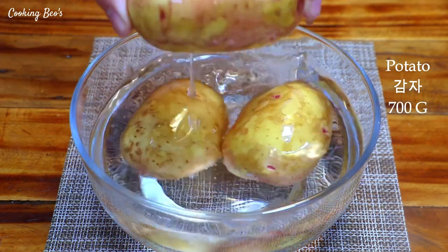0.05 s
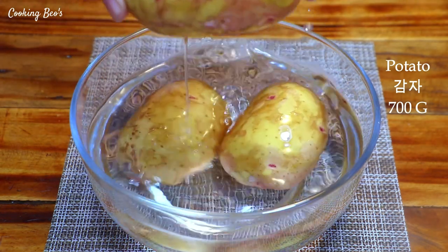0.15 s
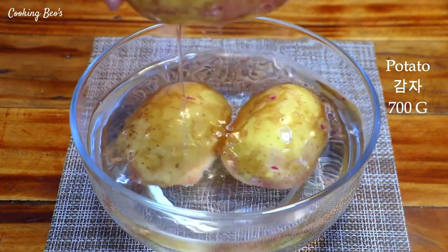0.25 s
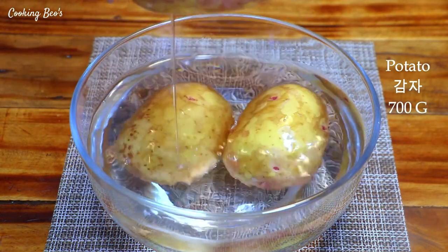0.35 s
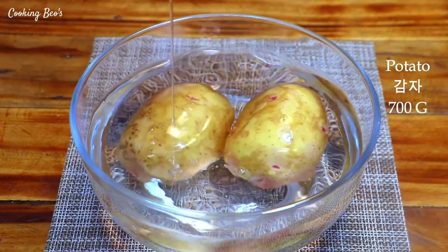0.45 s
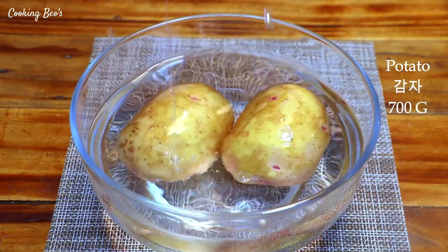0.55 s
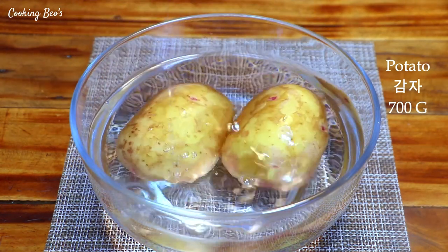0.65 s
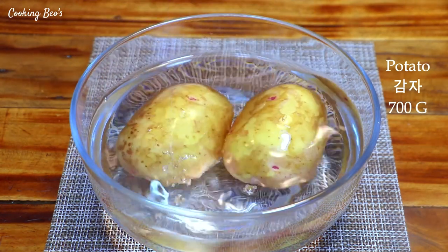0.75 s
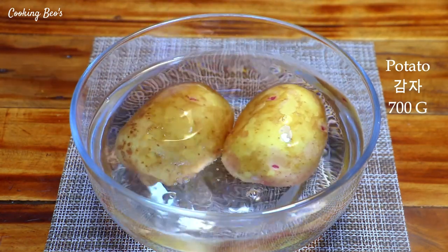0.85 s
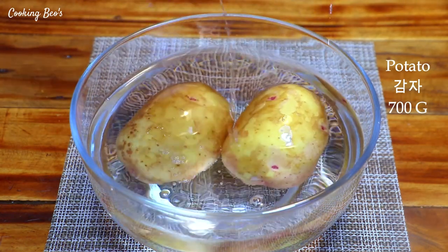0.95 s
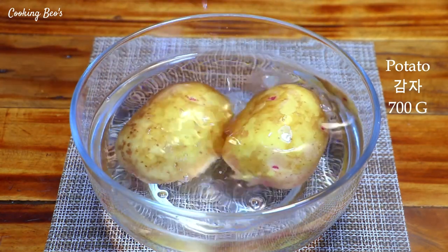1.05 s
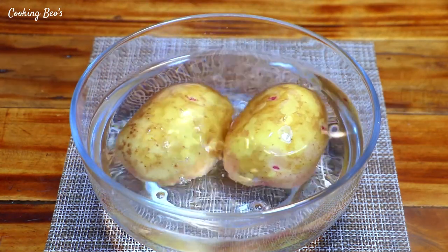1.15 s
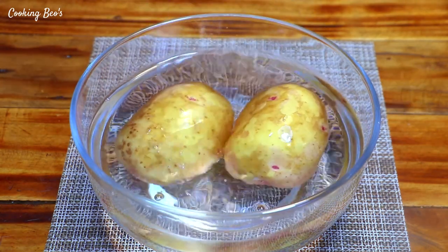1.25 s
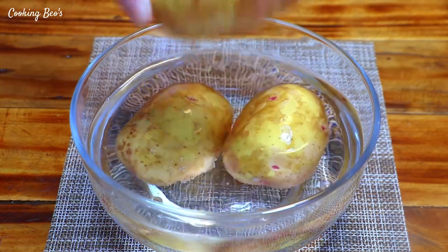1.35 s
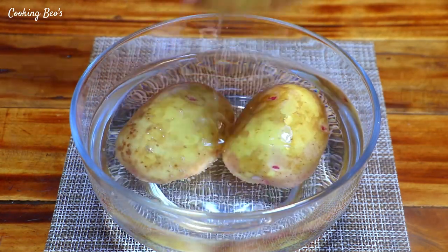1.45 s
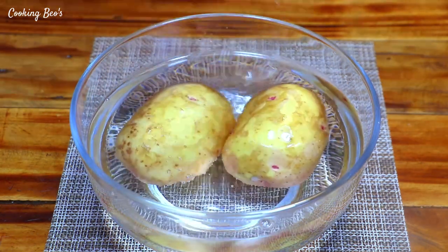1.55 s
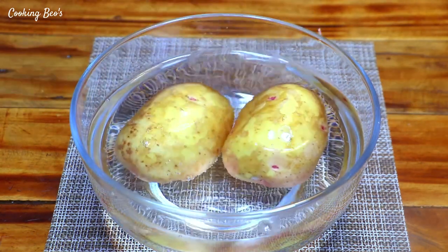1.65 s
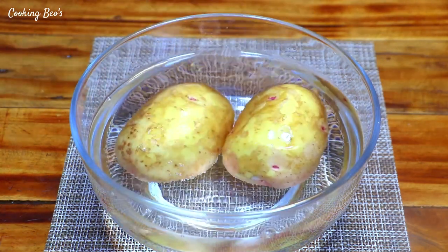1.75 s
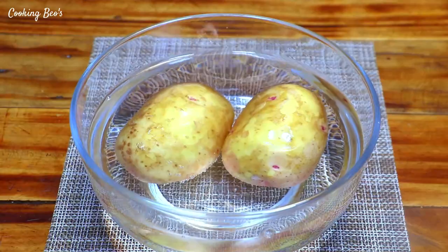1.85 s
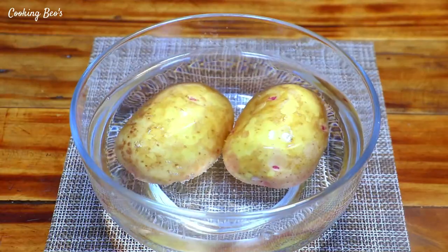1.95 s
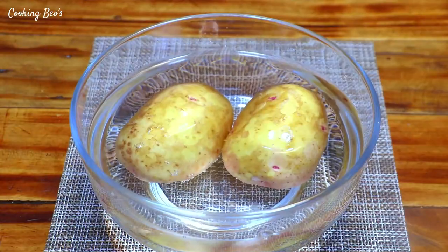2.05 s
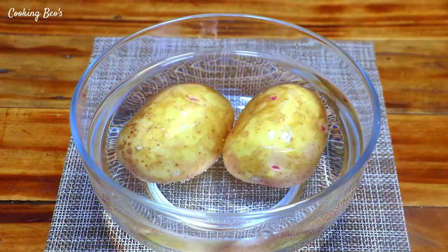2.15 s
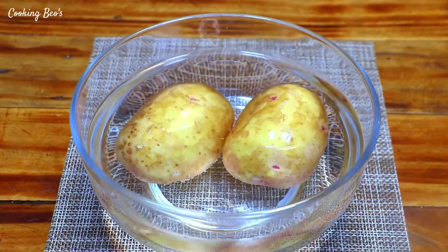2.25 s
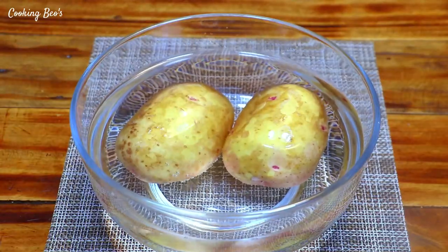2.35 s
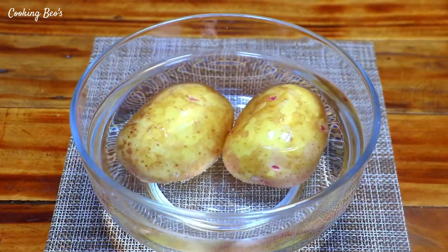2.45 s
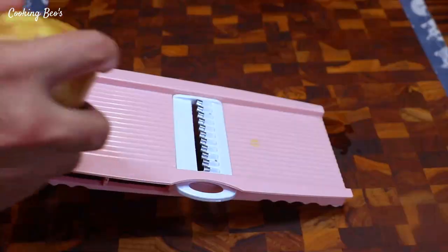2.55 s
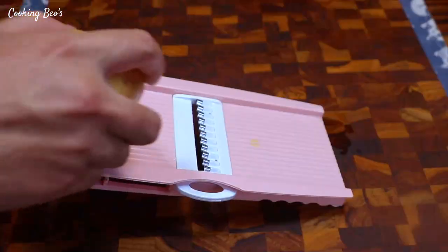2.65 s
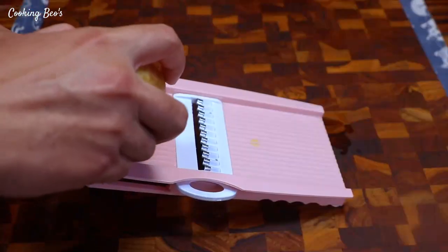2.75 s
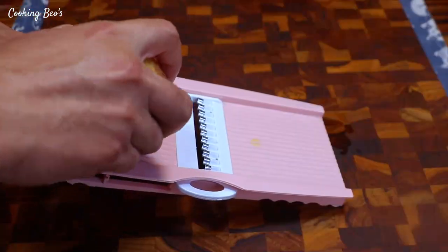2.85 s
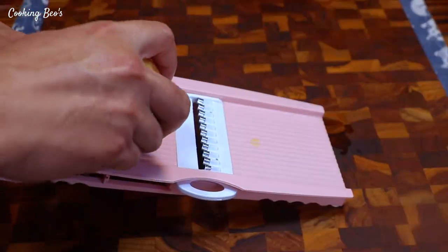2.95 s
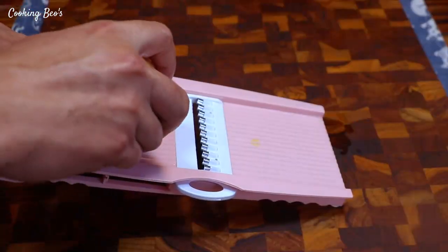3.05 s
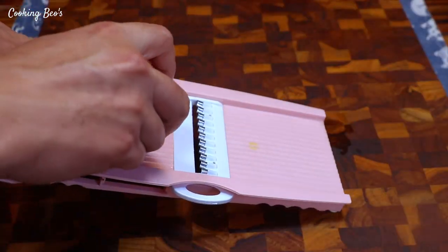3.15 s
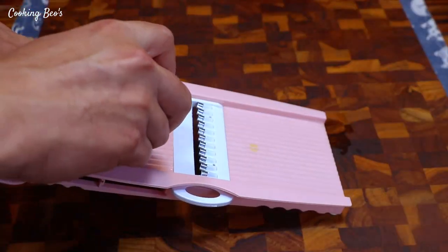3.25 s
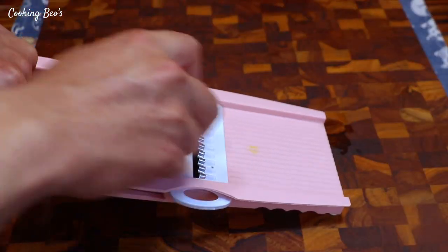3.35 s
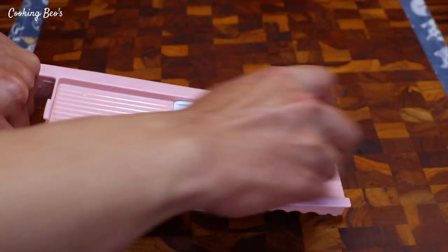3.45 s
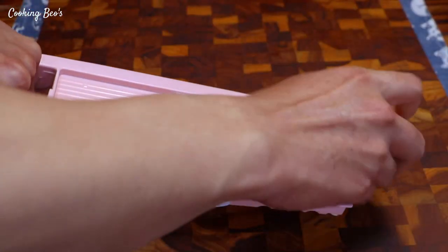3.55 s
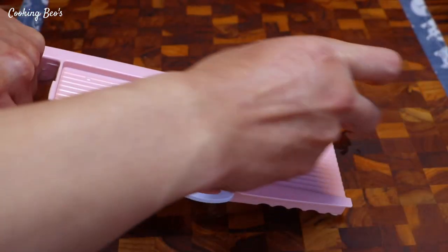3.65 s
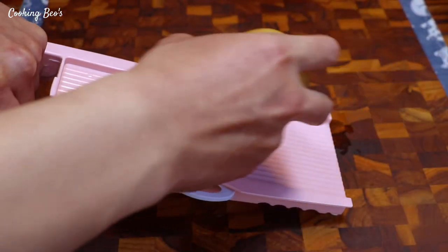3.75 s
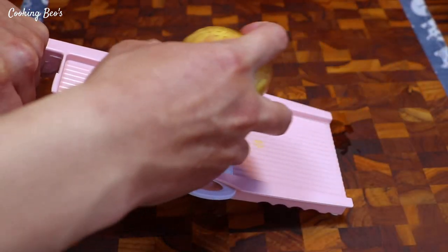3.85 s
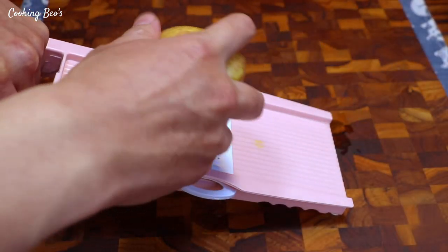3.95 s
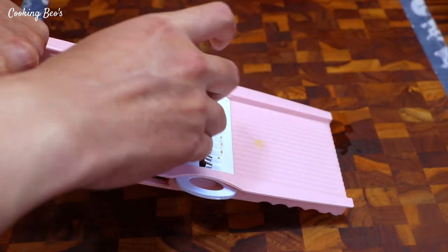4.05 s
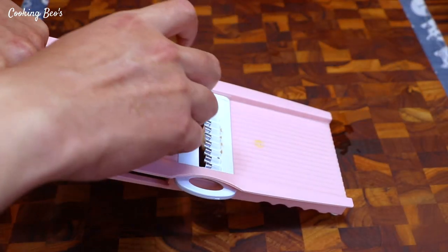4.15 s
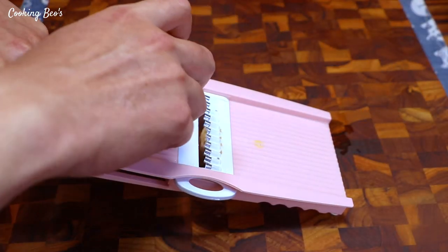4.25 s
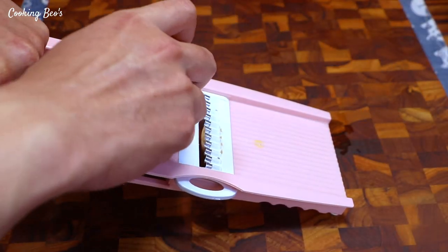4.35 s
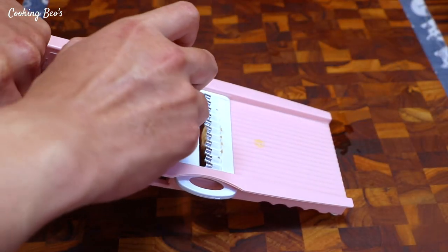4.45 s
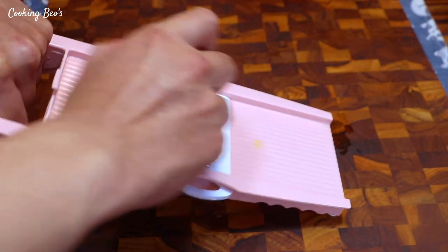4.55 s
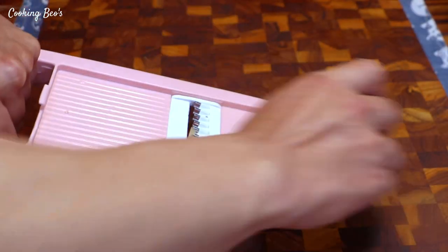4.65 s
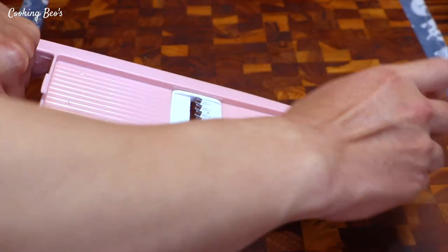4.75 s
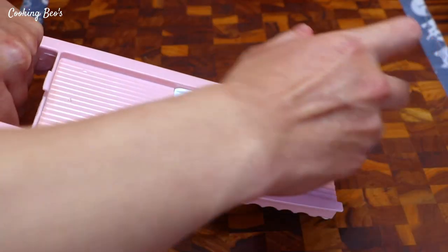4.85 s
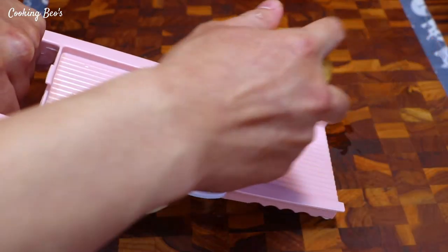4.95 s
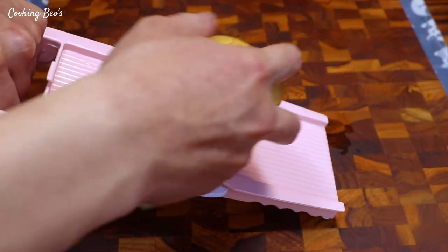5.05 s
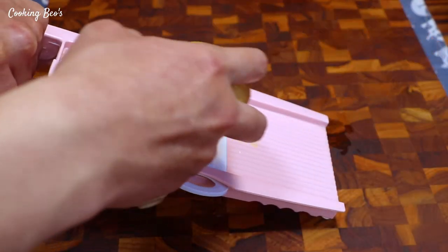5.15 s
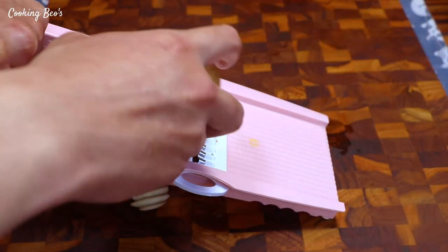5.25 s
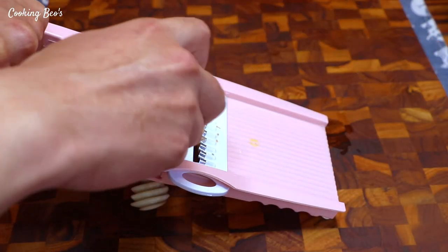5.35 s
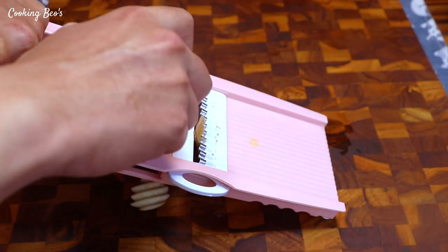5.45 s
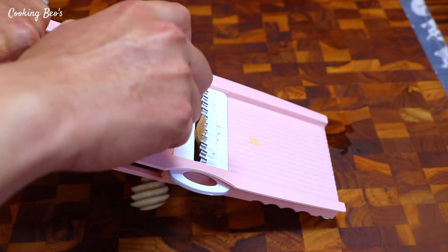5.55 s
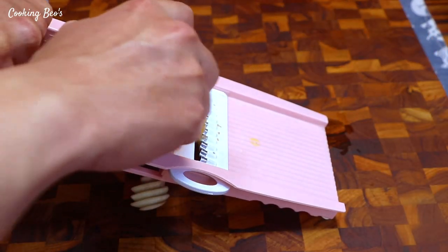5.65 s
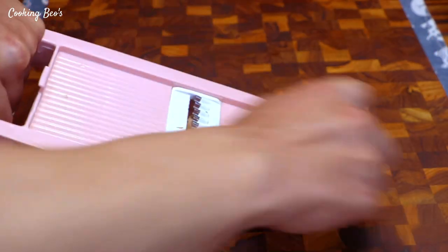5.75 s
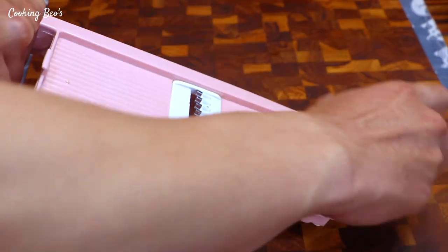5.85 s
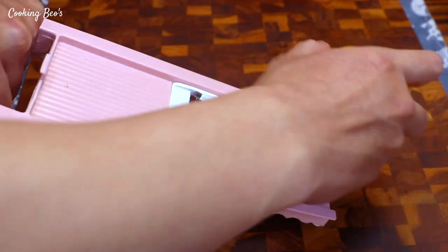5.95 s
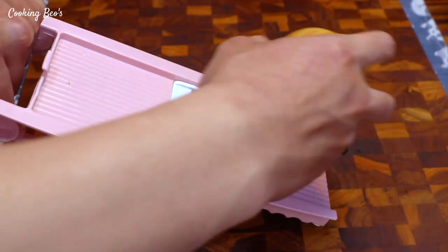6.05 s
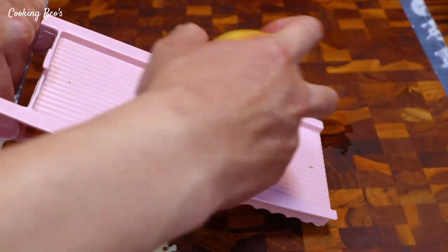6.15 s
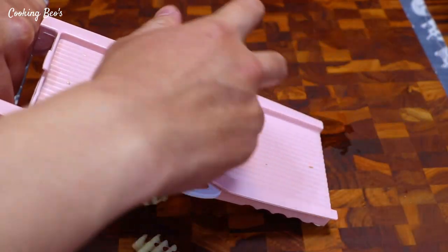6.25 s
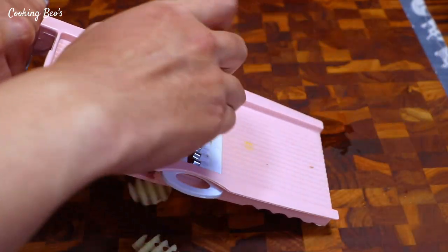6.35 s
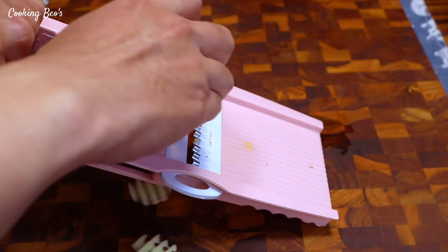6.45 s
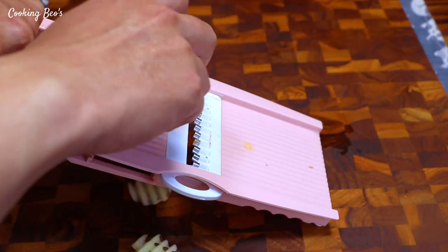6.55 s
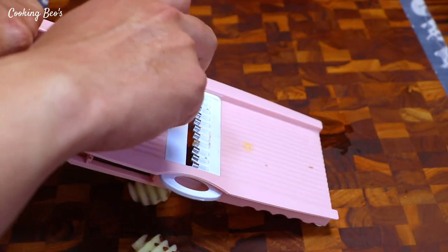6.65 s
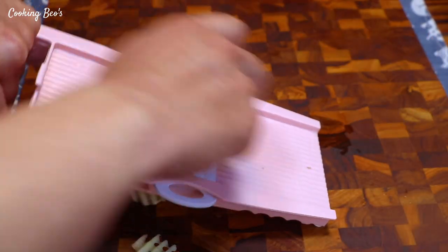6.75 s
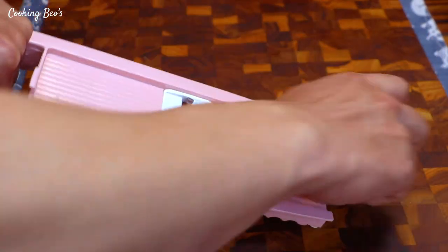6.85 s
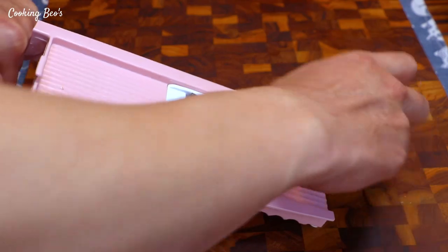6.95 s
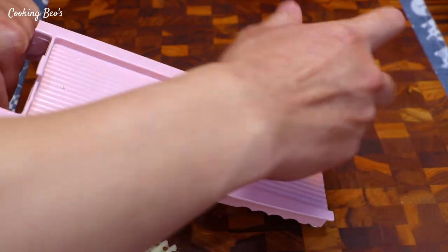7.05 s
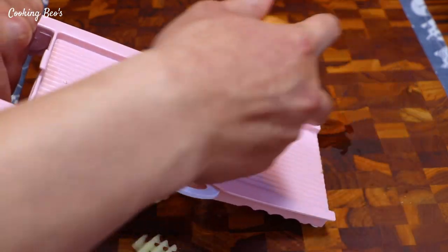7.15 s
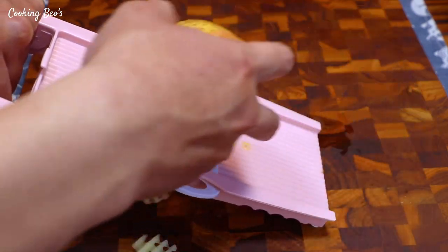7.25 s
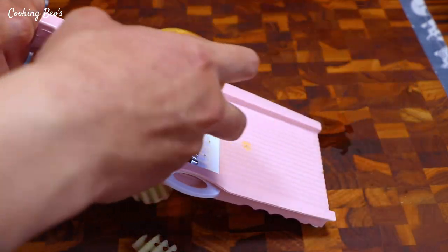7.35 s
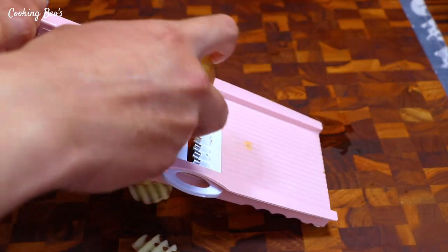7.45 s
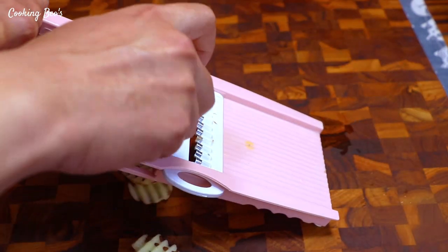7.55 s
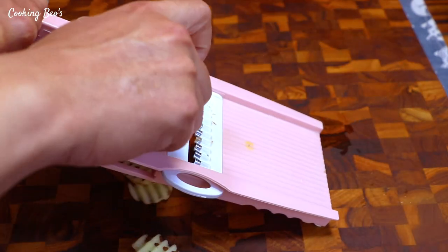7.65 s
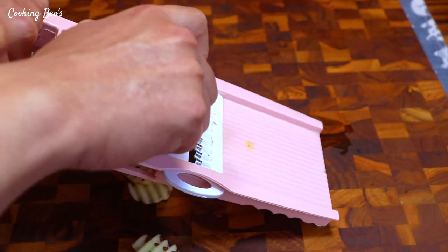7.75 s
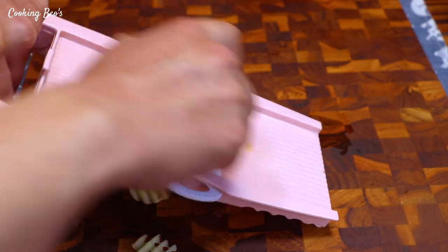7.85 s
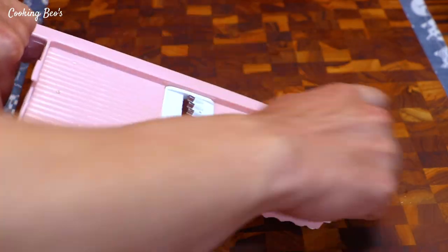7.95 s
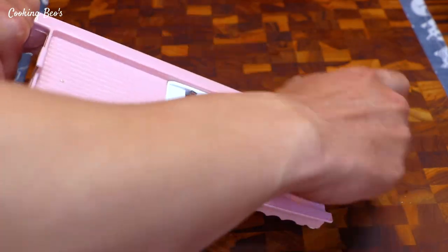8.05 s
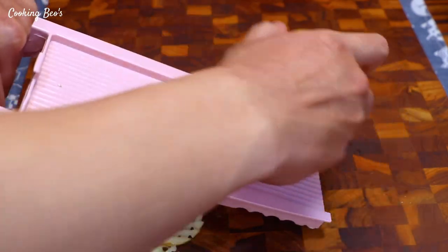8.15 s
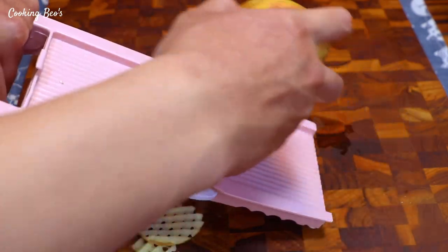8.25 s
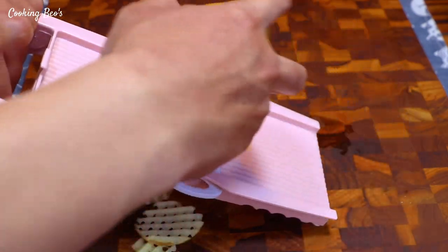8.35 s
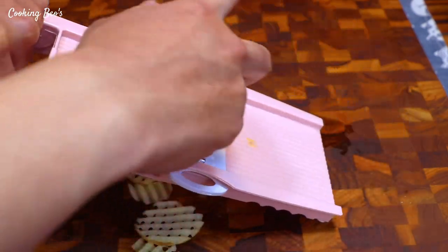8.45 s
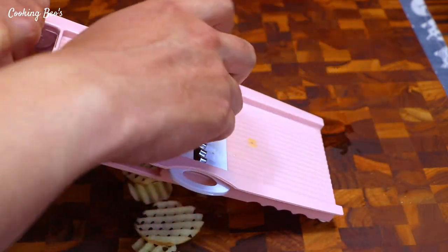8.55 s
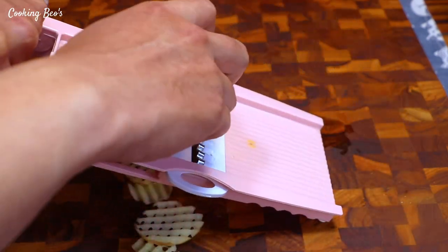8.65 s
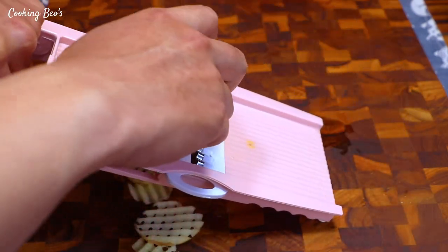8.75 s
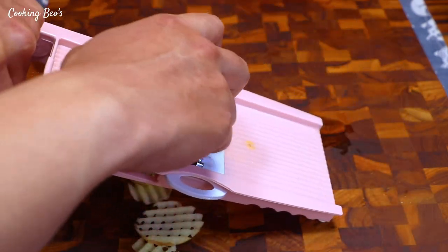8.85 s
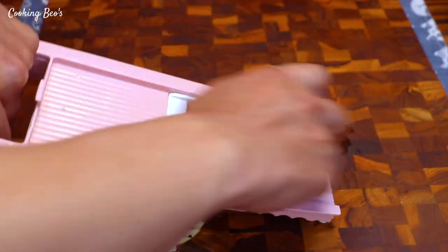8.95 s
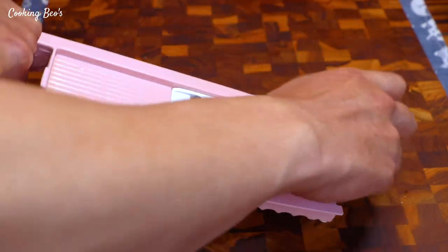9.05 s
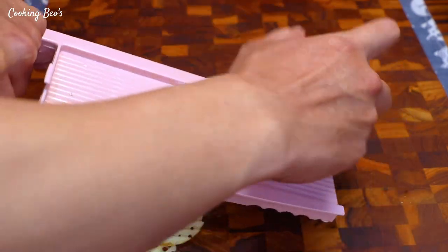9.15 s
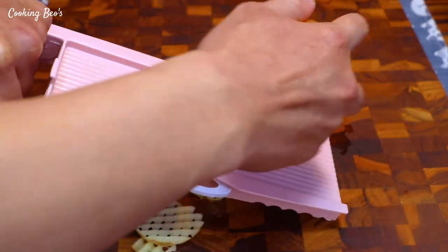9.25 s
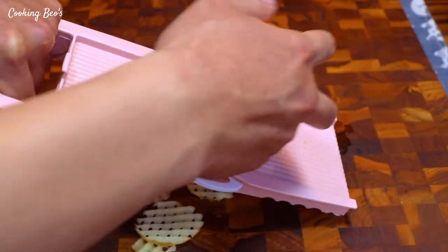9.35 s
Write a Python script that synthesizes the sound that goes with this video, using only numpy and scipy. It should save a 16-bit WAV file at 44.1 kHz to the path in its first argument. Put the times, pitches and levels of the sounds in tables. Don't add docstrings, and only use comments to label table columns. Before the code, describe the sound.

Brief bubbly dripping, a quiet pause, then a raw potato is sliced in six loud, crunchy swipes with short hissing glides and soft taps.

```python
import sys
import numpy as np
from scipy import signal
from scipy.fft import rfft, irfft, next_fast_len
from scipy.io import wavfile
from scipy.ndimage import uniform_filter1d, minimum_filter1d, map_coordinates

SR = 44100
rng = np.random.default_rng(int(sys.argv[2]) if len(sys.argv) > 2 else 0)


def generate_wav(sig):
    pcm = np.round(np.clip(np.atleast_2d(sig).T, -1, 1) * 32767).astype(np.int16)
    wavfile.write(sys.argv[1], SR, pcm)


def ratio_of_db(decibels):
    return 10 ** (np.asarray(decibels, float) / 20)


N = 414099
TIME = np.arange(N) / SR
SCENE_CHANGE_S = 2.5

# start_s, peak_db, pitch_hz, end_pitch_ratio
DROPS = [(0.0, -17.5, 3348, .97), (.03, -22.5, 1537, 0.97), (.038, -30, 1580, 0.8), (.059, -20, 3068, .93),
         (.365, -17, 4370, 0.89), (.384, -23.5, 3530, 0.91), (.459, -19.5, 1940, 0.87),
         (.499, -35.5, 4260, 1.06), (.513, -29, 1660, 0.97), (.549, -14.5, 6470, 1.12),
         (.566, -26, 1324, 1.2), (.6, -20, 1770, 0.93), (.608, -25, 1740, 0.71), (.648, -18, 2970, 1.1),
         (.656, -11, 2560, .98), (.671, -19, 2533, 1.17), (.69, -21.5, 4190, 0.96), (.702, -19, 2030, 1.13),
         (.751, -24.5, 2610, 0.91), (.904, -20.5, 4530, 1.02)]
# start_s, peak_db, pitch_hz, t60_s, end_pitch_ratio
RISING_BUBBLES = [(.4705, -25, 3750, 0.013, 0.83), (.4745, -29.5, 3500, 0.013, 1.3),
                  (.5497, -26, 1234, 0.037, 1.02), (.6091, -36.5, 2406, 0.021, 2),
                  (.6311, -22.5, 3375, 0.025, 1.6), (.6402, -27, 2510, 0.036, 1.7),
                  (.6572, -14.5, 3320, .026, 1.4), (.7501, -25.5, 3860, 0.017, .97),
                  (0.7576, -24, 2770, 0.036, 4.2), (.8343, -20, 1653, 0.074, 0.94),
                  (.9034, -34.5, 3530, 0.038, 1.05)]
# start_s, peak_db, pitch_hz
SPLATS = [(.0098, -35, 10100), (0.2313, -29, 12800), (0.2469, -29, 4260), (0.4058, -38.5, 3300),
          (0.6726, -31.5, 7270), (.7422, -37, 12000), (1.0751, -44, 9100), (1.1147, -40, 4300),
          (1.1753, -48, 7570)]
# time_s, level_db
TRICKLE = [(0, -50), (.1, -56), (.32, -62.5), (.42, -55), (.6, -42), (.78, -41), (.95, -53.5), (1.1, -71)]
# frequency_hz, density_db_per_hz
SPRAY_COLOUR = [(2500, -40), (5000, 1.5), (9000, 0), (15600, -2.5), (15950, -40.5)]

# time_s, level_db
BUILDING_LEVEL = [(0, -70), (1.2, -72), (2.451, -73), (2.551, -73.5), (3.4, -73), (4.401, -76),
                  (5.3, -72.5), (6.4, -73), (7.35, -75.5), (7.6, -71), (8.6, -73), (9.39, -69.5)]
# frequency_hz, density_db_per_hz
RUMBLE_COLOUR = [(15, -40.5), (45, -8), (70, -12.5), (102, -6), (180, -3.5), (300, -6), (1000, -16.5),
                 (2500, -61.5)]
# frequency_hz, density_db_per_hz
HISS_COLOUR = [(400, -20.5), (900, 2), (1500, 0), (3000, -3), (6000, -7.5), (10000, -8), (16000, -4.5)]
# frequency_hz, level_db
MAINS_TONES = [(48.4, -81), (102.3, -72.5)]
# time_s, pitch_hz, level_db
PIPE_HUM = [(2.13, 477.9, -98), (2.18, 480, -67.5), (2.28, 440, -76), (2.39, 404.2, -66.5),
            (2.43, 402.9, -95)]
# frequency_hz, t60_s
ROOM_DECAY = [(150, 0.59), (260, 1.1), (600, 0.49), (3000, 0.55), (8000, 0.63), (15000, 0.15)]
# frequency_hz, level_db
WALL_FEED = [(100, -3.5), (280, 5), (700, 1.5), (1500, 1), (2700, -0.5), (3700, -3.5), (6000, 1.5),
             (15000, -1)]

# start_s, end_s, level_db
RUSTLES = [(1.602, 1.974, -71.5), (2.624, 2.901, -75), (3.173, 3.297, -73.5), (5.424, 5.52, -70.5),
           (6.448, 6.649, -72.5), (7.597, 7.902, -75), (8.444, 8.595, -77)]
# frequency_hz, level_db
SKIN_COLOUR = [(400, -25), (900, 1.5), (2000, -3), (3500, -1.5), (6000, -13), (15000, -19.5)]
# start_s, peak_db, knock_hz, push_db, tick_db
CONTACTS = [(3.05, -41.5, 1355, -4, -8), (3.449, -46, 1368, -22, -13), (4.218, -47.5, 1248, 3.5, -16),
            (5.086, -36, 887.3, -17, -15), (5.169, -48, 824, -14, -21), (5.219, -52.5, 631, -15, -16),
            (5.461, -53, 805, 4.5, -10.5), (5.751, -49.5, 3097, -20, -5.5), (6.189, -50, 701.7, -16, -16.5),
            (6.461, -48, 908, -14.5, -4.5), (7.944, -30.5, 420, -7.5, -8), (8.264, -35, 854.5, -19.5, -11),
            (8.670, -50.5, 3009, 9.5, -11), (9.311, -35, 1458, -8.5, -20.5)]

# start_s, end_s, tearing_db, swell_db, frame_db
CUTS = [
    (3.498, 3.544, -14.5, 8.5, -18),
    (4.682, 4.712, -10, 1.7, -3),
    (5.801, 5.836, -9.5, -0.96, 0.85),
    (6.853, 6.896, -10.5, 2, -5.5),
    (7.964, 8.01, -10, 1.45, -9),
    (9, 9.054, -11, 4.3, -8.5),
]
# start_s, level_db
TOOTH_SNAPS = [(3.5029, -2), (3.512, -9), (3.531, -5), (3.5423, -1), (3.5737, -19.5), (4.6901, -5),
               (4.706, -5), (4.7115, -2.5), (5.797, -14.5), (5.8092, -5.5), (5.815, -7), (5.8223, -4.5),
               (5.8476, -25.5), (6.8591, -6.5), (6.8667, -4), (6.8731, -7.5), (6.8797, -10), (6.8935, -6),
               (6.913, -22), (7.9625, -0.5), (7.9709, -11), (7.9796, -5.5), (7.9875, -6), (7.9954, -4.5),
               (8.0023, -3.5), (9.0079, -7), (9.0272, -9), (9.0337, -9), (9.0392, -2.5), (9.0448, -2.5)]
# frequency_hz, width_hz, level_db
BLADE_MODES = [(1400, 830, -8.5), (2020, 630, -5.5), (3340, 520, -4), (4020, 440, -4.5),
               (5000, 1400, -15.5)]
# frequency_hz, width_hz, level_db
FRAME_MODES = [(206.5, 30, -2.5), (303, 30, -0.5), (384, 99, -3), (681.2, 300, 2), (858, 720, 0)]
# frequency_hz, level_db
CELL_COLOUR = [(3000, -28.5), (5500, -3), (7200, -4), (8500, -1), (10500, -5), (13000, 0.5), (15500, -11)]
# frequency_hz, density_db_per_hz
RAMP_COLOUR = [(250, -16.5), (700, -9.5), (1500, -11.5), (4000, -12.5), (6500, -22.5), (11000, -27.5),
               (15600, -26.5), (15950, -60)]
# frequency_hz, width_hz, level_db
BOARD_MODES = [(232, 40, 0), (305, 31, 0.76)]
# start_s, peak_db
SKIN_TICKS = [(5.712, -44), (6.559, -47), (6.721, -39.5), (7.641, -40.5), (7.691, -37.5), (7.715, -37.5),
              (7.761, -34), (7.771, -39), (7.78, -42.5), (7.818, -41), (7.862, -42), (6.463, -36.5)]


def unit(x):
    return x / np.sqrt(np.mean(x ** 2) + 1e-20)


def along(points, hz):
    f, v = np.transpose(points)
    return np.interp(np.log(hz + 1), np.log(f + 1), v)


def coloured(table):
    return lambda hz: ratio_of_db(along(table, hz))


def filtered(x, response):
    m = next_fast_len(N + SR // 2)
    return irfft(rfft(x, m) * response(np.fft.rfftfreq(m, 1 / SR)), m)[:N]


def modes(table):
    def response(f):
        total = 0
        for k, (centre, width, db) in enumerate(table):
            damping = 1j * f * width
            total = total + (-1) ** k * ratio_of_db(db) * damping / (centre * centre - f * f + damping)
        return total
    return response


def wobble(rate):
    return map_coordinates(rng.standard_normal(int(N * rate / SR) + 4), [TIME * rate])


def played(envelope, response, grain_db):
    grains = unit(rng.standard_normal(N) * ratio_of_db(grain_db * rng.exponential(1, N)))

    def even(hz):
        gain = response(hz)
        return gain / np.sqrt(np.mean(np.abs(gain) ** 2))
    return filtered(envelope * grains, even)


def drips():
    out, t = np.zeros(N + SR), np.arange(SR // 10) / SR
    moment, size, pitch = rng.random(size=(110, 3)).T
    when = 1.2 * moment
    size_db = np.interp(when, *np.transpose(TRICKLE)) + 12 * size
    # start_s, peak_db, pitch_hz, t60_s, end_pitch_ratio, splash_db
    patter = [(s, db, 1700 * 3 ** u, 0.008, 1.03, -9) for s, db, u in zip(when, size_db, pitch)]
    drops = [(s, db, hz, 0.017, ratio, -11) for s, db, hz, ratio in DROPS]
    splats = [(s, db, hz, 0.0074, 1.1, 3) for s, db, hz in SPLATS]
    rising = [(*row, -15) for row in RISING_BUBBLES]
    for s, db, hz, t60, ratio, splash_db in drops + splats + rising + patter:
        pitch_hz = hz * min(ratio, 1.75) ** np.tanh(3 * t / t60)
        phase = 2 * np.pi * np.cumsum(pitch_hz) / SR
        bubble = np.sin(phase) * ratio_of_db(-60 * t / t60) * (1 - np.exp(-t / 0.0001))
        splash = signal.lfilter([1, -0.8], 1, rng.standard_normal(len(t)))
        splash *= ratio_of_db(splash_db - 0.5 - 60 * t / 0.0045)
        out[round(s * SR):][:len(t)] += ratio_of_db(db + 6) * (bubble + splash)
    trickle_db = np.interp(TIME, *np.transpose(TRICKLE), right=-120)
    spray = ratio_of_db(trickle_db - 13.5 + 2.5 * wobble(50))
    return out[:N] + played(spray, coloured(SPRAY_COLOUR), grain_db=3)


def background():
    def noise(table):
        return unit(filtered(rng.standard_normal(N), coloured(table)))

    at_board = TIME > SCENE_CHANGE_S
    busy_db = np.interp(TIME, *np.transpose(BUILDING_LEVEL))
    hiss_db = -75 + 0.3 * (busy_db - busy_db.mean()) - 3 * at_board
    rumble = ratio_of_db(busy_db + 17.5 + 0.88 * wobble(14)) * noise(RUMBLE_COLOUR)
    hiss = ratio_of_db(hiss_db + 21 + 0.66 * wobble(5.7)) * noise(HISS_COLOUR)
    buzz = np.zeros(N)
    for hz, db in MAINS_TONES:
        level = ratio_of_db(db + 18 + 1.6 * wobble(23) - 4 * at_board)
        buzz += level * np.sin(2 * np.pi * hz * TIME + 0.31 * wobble(7.3))
    s, hz, db = np.transpose(PIPE_HUM)
    phase = 2 * np.pi * np.cumsum(np.interp(TIME, s, hz)) / SR
    hum = ratio_of_db(np.interp(TIME, s, db) + 17 + 2.5 * wobble(30)) * np.sin(phase)
    return rumble + hiss + buzz + hum


def kitchen(x):
    out = np.zeros(N + 3 * SR)
    sent = filtered(x, coloured(WALL_FEED))
    for start in range(0, N, SR):
        hz, t, z = signal.stft(rng.standard_normal(SR), SR, nperseg=256)
        decay = ratio_of_db(-60 * t / along(ROOM_DECAY, hz)[:, None])
        tail = signal.istft(z * decay, SR, nperseg=256)[1][:SR]
        wet = signal.fftconvolve(sent[start:start + SR], tail / np.linalg.norm(tail))
        out[start + 200:][:len(wet)] += wet
    return out[:N]


def rustles():
    swell = np.zeros(N)
    for start, end, db in RUSTLES:
        progress = np.clip((TIME - start) / (end - start), 0, 1)
        swell += ratio_of_db(db + 18) * np.sin(np.pi * progress)
    return played(swell * ratio_of_db(1.3 * wobble(40)), coloured(SKIN_COLOUR), grain_db=3)


def taps():
    def peak(v):
        return v / np.abs(v).max()

    out, t = np.zeros(N + SR), np.arange(SR // 10) / SR
    push_band = signal.butter(2, [60, 350], "band", fs=SR)
    tick_band = signal.butter(2, [900, 7500], "band", fs=SR)
    envelope = ratio_of_db(-60 * t / 0.036) * (1 - np.exp(-t / 0.00086))
    for s, db, hz, push_db, tick_db in CONTACTS:
        body, board, edge = rng.standard_normal(size=(3, len(t))) * envelope
        ring = signal.iirpeak(hz, 1.6, SR)
        knock = signal.lfilter(*ring, signal.lfilter(*ring, body))
        push = signal.lfilter(*push_band, board)
        tick = signal.lfilter(*tick_band, edge * ratio_of_db(-60 * t / 0.008))
        contact = peak(knock) + ratio_of_db(push_db) * peak(push) + ratio_of_db(tick_db) * peak(tick)
        out[round(s * SR):][:len(t)] += ratio_of_db(db + 11) * contact
    return out[:N]


def slicer():
    drive = np.zeros((3, N + SR))
    breaks = np.zeros(N)
    lead = SR // 4
    t = np.arange(-lead, lead) / SR
    age = np.arange(SR // 10) / SR
    body, crack = ratio_of_db(0.5 - 60 * age / 0.03), ratio_of_db(-1 - 60 * age / 0.0013)
    snap = (body + crack) * (1 - np.exp(-age / 0.0003))
    slide = ratio_of_db(-33.5) * (ratio_of_db(-230 * np.abs(t)) + ratio_of_db(8 - 1000 * np.abs(t))) * (t < 0)
    for k, (start, end, db, swell_db, frame_db) in enumerate(CUTS):
        bite_in = np.clip(t / 0.003, 0, 1)
        let_go = ratio_of_db(-60 * np.maximum(t - (end - start), 0) / 0.028)
        tear = ratio_of_db(swell_db * np.clip(t / (end - start), 0, 1)) * bite_in * let_go
        cells_db = -3.5 - 0.47 * k
        shares = ratio_of_db([[0], [frame_db], [cells_db]])
        drive[:, round(start * SR) - lead:][:, :len(t)] += ratio_of_db(db) * shares * (tear + slide)
        for s, snap_db in TOOTH_SNAPS:
            if abs(s - start) >= 0.5:
                continue
            breaks[round(s * SR)] = ratio_of_db(snap_db + 23) * rng.choice([-1, 1])
            jolt_db = -7.5 + 8.5 * np.exp(-abs(s - start) / 0.008)
            shares = ratio_of_db([[0], [frame_db + jolt_db], [-16.5]])
            drive[:, round(s * SR):][:, :len(age)] += ratio_of_db(snap_db) * shares * snap
    blade, frame, cells = drive[:, :N] * ratio_of_db(2.9 * np.tanh(wobble(260)))

    def small(hz):
        return (1j * hz / (170 + 1j * hz)) ** 2

    def blade_response(hz):
        return modes(BLADE_MODES)(hz) * small(hz / 3)

    def frame_response(hz):
        return modes(FRAME_MODES)(hz) * small(hz)

    def break_response(hz):
        click = 0.06 * (hz < 15800) * 1j * hz / (6000 + 1j * hz)
        return blade_response(hz) + 0.8 * frame_response(hz) + click

    cell_colour = [(20, -120)] + list(CELL_COLOUR) + [(15950, -50.5)]
    ringing = played(blade, blade_response, grain_db=2.5) + played(frame, frame_response, grain_db=2.5)
    crisp = played(cells, coloured(cell_colour), grain_db=5.5)
    return ringing + crisp + filtered(breaks, break_response)


def glide():
    push, drone, t = np.zeros(N + SR), np.zeros(N + SR), np.arange(SR) / SR
    stop = 0.5 - 0.5 * np.tanh((t - 0.31) / 0.05)
    for start, end, db, _, frame_db in CUTS:
        slowing = ratio_of_db(db - 18 - 60 * t)
        push[round(end * SR):][:SR] += slowing * np.clip(t / 0.017, 0, 1) * stop
        ringing = ratio_of_db(db - 19.5 + frame_db - 60 * t / 1.2)
        drone[round(start * SR):][:SR] += ringing * np.clip(t / 0.03, 0, 1)

    def wood(hz):
        return modes(BOARD_MODES)(hz) ** 2

    ramp_colour = [(20, -81)] + list(RAMP_COLOUR)
    hiss = played(push[:N] * ratio_of_db(1.2 * wobble(70)), coloured(ramp_colour), grain_db=0.8)
    return hiss + filtered(drone[:N] * rng.standard_normal(N) * ratio_of_db(22), wood)


def ticks():
    out, t = np.zeros(N), np.arange(SR // 50) / SR
    band = signal.butter(2, [1100, 5500], "band", fs=SR)
    for s, db in SKIN_TICKS:
        click = np.append(3, rng.standard_normal(len(t) - 1)) * ratio_of_db(-60 * t / 0.006)
        click = signal.lfilter(*band, click)
        out[round(s * SR):][:len(t)] += ratio_of_db(db) * click / np.abs(click).max()
    return out


def scene():
    water, cuts = drips(), slicer()
    hands = taps() + rustles() + ticks()
    room = kitchen(ratio_of_db(-14) * water + ratio_of_db(-19) * cuts + ratio_of_db(-16) * hands)
    return (water + background() + room + hands + cuts + glide())[None]


def gate(x, over_db, knee_db):
    frames = dict(nperseg=2048, noverlap=1536)
    gate_scale_db = 20 * np.log10(4.5)
    z = signal.stft(x, **frames)[2]
    power = uniform_filter1d(np.abs(z) ** 2, size=21, axis=0)
    level_db = 10 * np.log10(np.abs(power) + 1e-20)
    quiet_db = np.percentile(level_db, 20, axis=1, keepdims=True)
    opening = 0.5 + 0.5 * np.tanh((level_db - quiet_db - over_db) / knee_db)
    held = -minimum_filter1d(-opening, size=5, axis=1)
    opening = uniform_filter1d(held, size=3, axis=1)
    return signal.istft(z * ratio_of_db(gate_scale_db * (opening - 1.5)), **frames)[1][:N]


def low_pass(x):
    return signal.sosfilt(signal.butter(12, 16310, fs=SR, output="sos"), x)


def record(dry):
    track, lag = dry[0], 768
    early = np.concatenate([track[lag:], np.zeros(lag)])
    mix = early * ratio_of_db(-19.5) + gate(track, over_db=14.5, knee_db=6.5)
    mix = mix / (1 + np.abs(mix) ** 10) ** (1 / 10)
    return low_pass(mix[None])


dry = scene()
out = record(dry)
generate_wav(out)
```